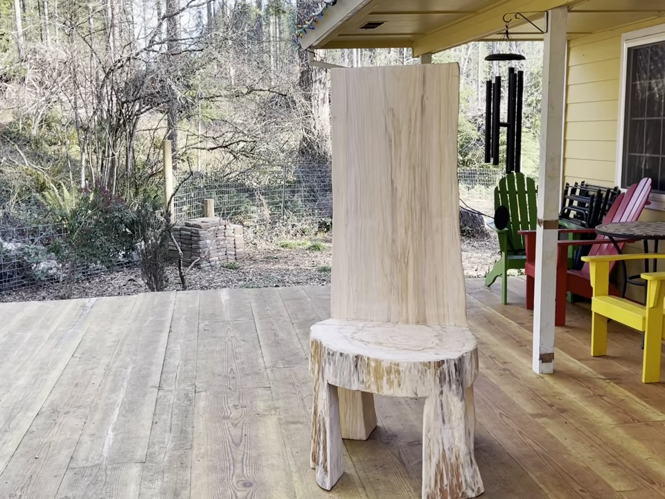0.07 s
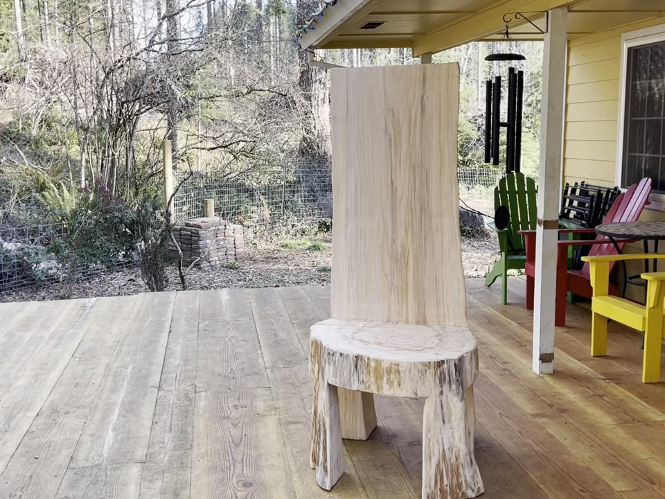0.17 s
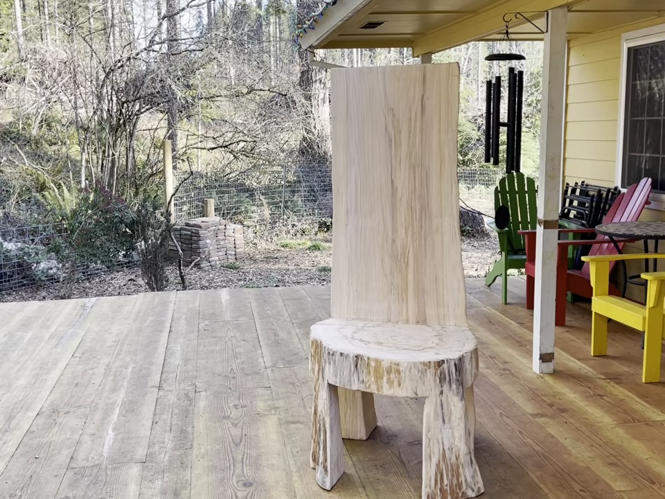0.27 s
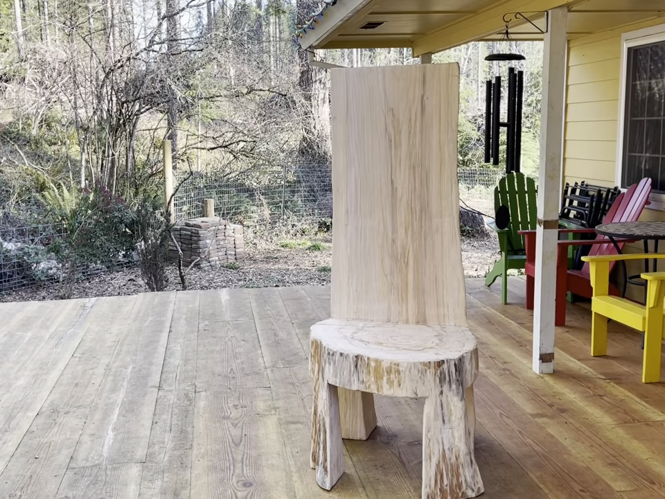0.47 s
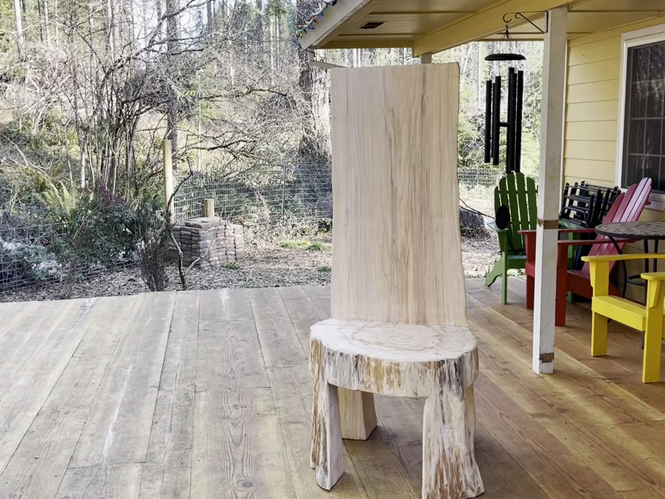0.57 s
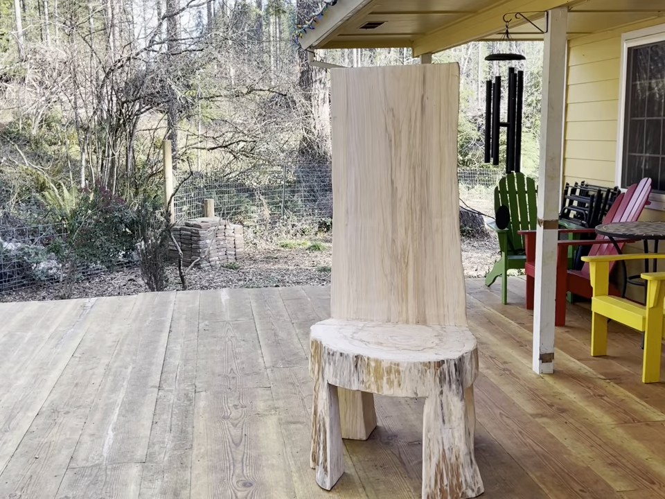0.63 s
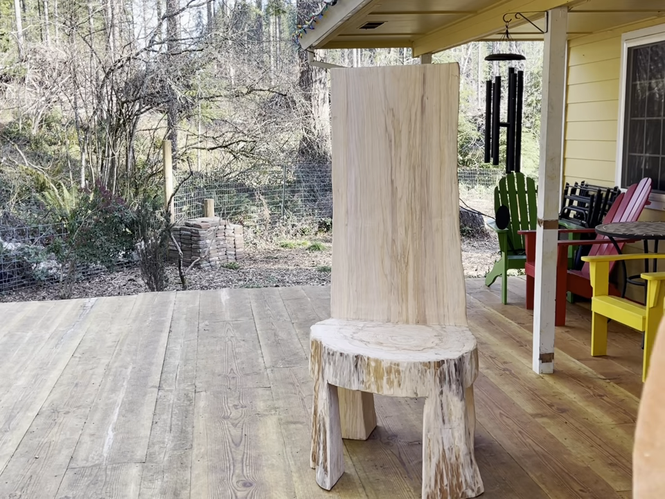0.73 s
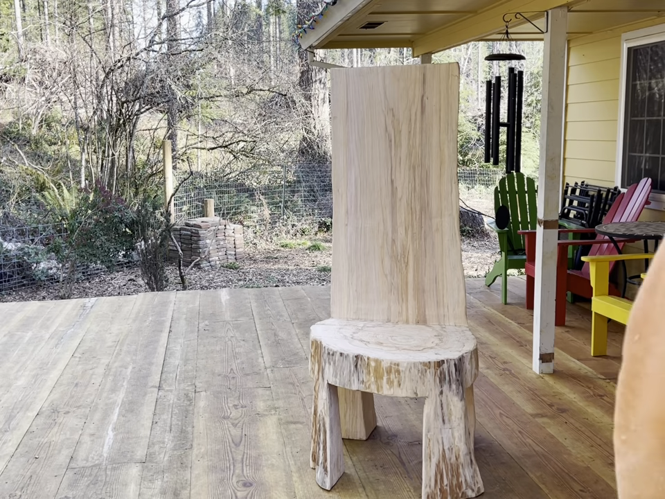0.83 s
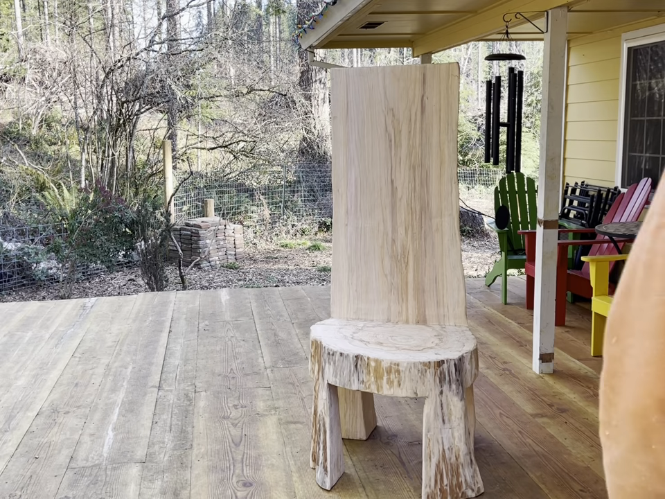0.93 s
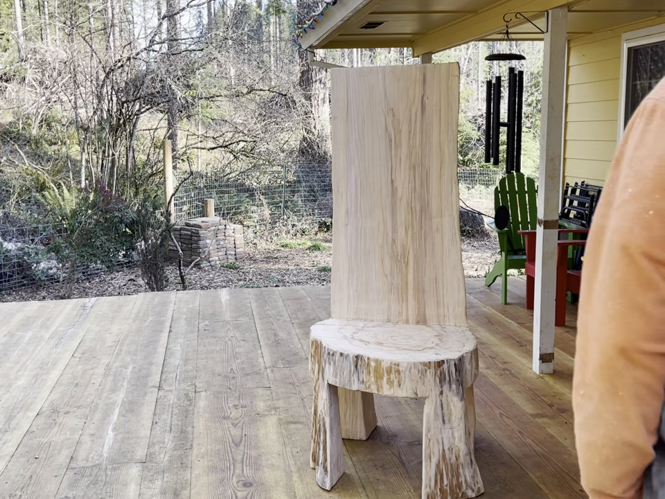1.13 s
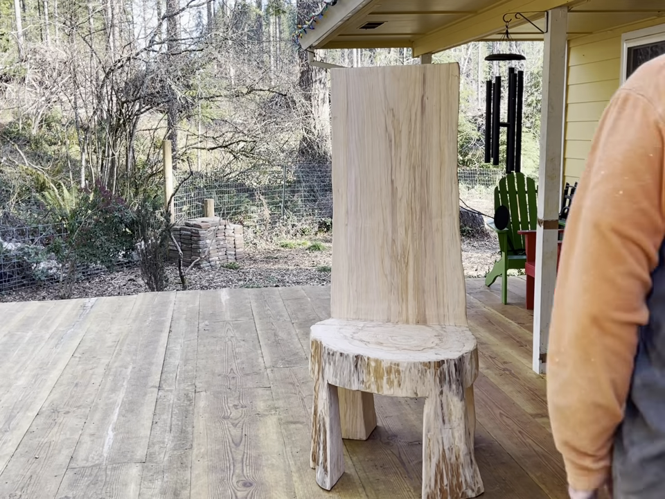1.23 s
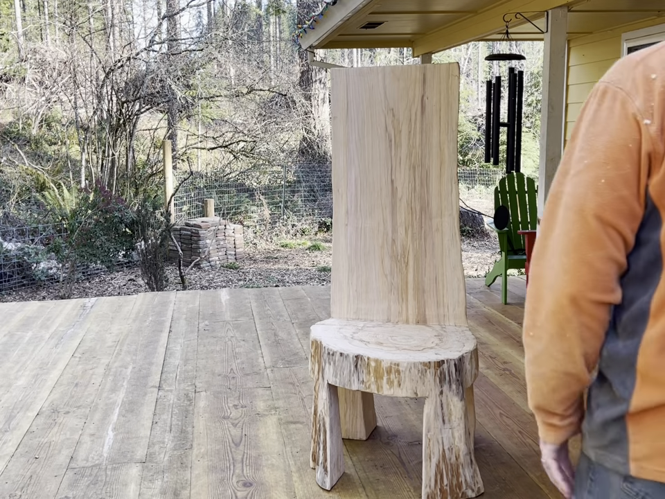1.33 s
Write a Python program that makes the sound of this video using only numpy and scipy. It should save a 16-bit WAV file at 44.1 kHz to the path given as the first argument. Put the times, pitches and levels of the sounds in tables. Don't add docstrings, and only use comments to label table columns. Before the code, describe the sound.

Two slow, heavy footsteps on a hollow wooden deck, the first loud and booming, the second softer with a clear toe slap; boards rattle, cloth rustles faintly, distant croaks and low rumble behind, close stereo microphone outdoors.

```python
import sys
import numpy as np
from scipy import signal
from scipy.fft import rfft, irfft
from scipy.io import wavfile
from scipy.ndimage import uniform_filter1d

SR = 44100
rng = np.random.default_rng(int(sys.argv[2]) if len(sys.argv) > 2 else 0)


def dump_mix(stems):
    frames = np.atleast_2d(stems).T
    limited = np.clip(frames, -1, 1)
    pcm = np.round(limited * 32767).astype(np.int16)
    wavfile.write(sys.argv[1], SR, pcm)


def makeup_ratio(level_db):
    decades = np.asarray(level_db, float) / 20
    return 10 ** decades


N = 61739

# (frequency [Hz], level [dB])
AIR_SPECTRUM = [(30, -28), (55, -3), (105, -6), (200, -20), (500, -34), (1300, -40), (3500, -59.5),
                (10000, -60.5)]
# (centre time [s], length [s], level [dB], pitch [Hz])
RUMBLE_SWELLS = [(0.024, 0.057, -51.5, 60.7), (0.124, 0.048, -50.5, 69), (0.468, 0.1, -50.5, 54),
                 (0.556, 0.043, -53, 68), (0.616, .06, -53, 97), (0.677, 0.13, -55.5, 59.7),
                 (0.766, 0.081, -49.5, 88.4), (0.846, 0.084, -51, 87.6), (0.984, 0.084, -44, 68.3),
                 (1.088, 0.066, -48.5, 95), (1.149, 0.056, -57, 85.5), (1.261, 0.073, -49, 91.3),
                 (1.328, 0.081, -51, 56), (1.375, 0.055, -50.5, 100)]
# (frequency [Hz], width [Hz], level [dB])
CHORUS_BANDS = [(760, 78, -3), (890, 44, -6.5), (682, 98, -2.5), (1750, 69, -15)]
# (time [s], level [dB])
CHORUS_LEVEL = [
    (0, -2.5),
    (0.421, -2.5),
    (.5, -1.5),
    (.92, -0.5),
    (1.15, 2.5),
    (1.4, -3),
]
# (start time [s], length [s], level [dB], pitch [Hz])
CROAKS = [(0.475, 0.039, -63, 760), (0.516, 0.025, -60.5, 761), (.545, .025, -67, 850),
          (.565, 0.024, -62, 888), (.588, 0.026, -66, 880), (0.607, 0.017, -57.5, 745),
          (0.636, 0.031, -60, 745), (0.675, 0.023, -64, 775), (0.703, 0.033, -66, 784),
          (0.726, 0.018, -67, 860), (.735, 0.022, -65, 680), (0.765, 0.012, -58, 786),
          (0.793, 0.022, -62, 760), (.79, 0.045, -67, 906), (.84, 0.047, -72, 715),
          (0.886, 0.022, -62.5, 792), (0.896, 0.02, -65, 850), (0.918, 0.025, -59, 760),
          (.575, 0.069, -76.5, 1790), (0.884, 0.036, -70.5, 1734), (1.248, 0.034, -74, 1750),
          (1.33, 0.055, -68, 703)]
# (time [s], level [dB], brightness [dB per octave])
STRIDE = [(.02, -85, -1.5), (.07, -81, -2.5), (0.162, -85.5, -3), (.2, -80.5, -0.5), (.26, -80, -2.5),
          (.37, -78, -2), (.45, -76, 1), (.6, -80.5, -1), (0.651, -88, -1.5), (0.904, -86, 0.5),
          (0.942, -72, -0.5), (1.05, -76, 1), (1.1, -77.5, -1.5), (1.18, -75.5, 0.5), (1.261, -84, -0.5),
          (1.4, -84.5, -2.5)]
# (frequency [Hz], level [dB])
CLOTH_SPECTRUM = [(500, 1), (1700, 0.5), (3000, -6), (6000, -12), (7400, -9.5), (9000, -5), (10500, -2.5),
                  (12300, -21)]
# (frequency [Hz], time to fall 60 dB [s])
DECK_DECAY = [(50, 0.88), (120, 0.74), (300, 0.63), (700, 0.26), (1500, 0.066), (5000, 0.075)]
# (frequency [Hz], level [dB], width [Hz])
BOARD_MODES = [(77, 4, 50), (135, -6.5, 5.9), (220, -0.5, 51), (280, 2.5, 20), (342, -0.5, 29),
               (464, 2.5, 42), (600, -3, 110), (715, 5, 45), (1080, -10, 83), (1195, 2, 130)]
# (time [s], peak level [dB], pitch [Hz], grainy tail [dB])
SOLE_TICKS = [(0.1945, -31.5, 1087, 15), (.1950, -49.5, 697, 27), (.1930, -52.5, 2340, 24),
              (.1930, -60, 4400, 14), (0.1944, -56.5, 9600, 24), (0.278, -44, 960, 5),
              (.2782, -58, 2670, 9), (0.57, -66, 8450, 8), (.9385, -41, 800, 9), (1, -70, 2200, 12),
              (.9378, -53, 9050, 21), (.9500, -53.5, 4840, 18), (1.0688, -44, 2830, 7),
              (1.0687, -42, 1500, 6), (1.0691, -34, 1020, 8.5), (1.077, -51, 1590, 14),
              (1.0980, -54, 915, 3), (1.1588, -49.5, 1710, 13.5)]
# (time [s], peak level [dB], pitch [Hz])
GRIT_CRACKS = [(.1955, -59, 5200), (.1958, -57, 3040), (.1990, -53, 1970), (.2010, -62, 3600),
               (.2105, -58, 3700), (.2080, -50, 1500), (.2150, -56, 1400), (.2240, -54, 1520),
               (.2330, -55, 1400), (.2220, -60, 2800), (.2780, -55.5, 3750), (.2770, -53, 1720),
               (.2850, -57, 1500), (.3460, -60, 1830), (1.0685, -56, 2160), (1.0760, -59, 2600),
               (1.0820, -57, 1700), (1.1240, -53, 1690), (1.1590, -53.5, 2700)]
# (time [s], peak level [dB], pitch [Hz], spread of the bending wave [ms], ringing of the deck [dB])
FOOT_BLOWS = [(0.197, -20, 355, 5.45, -5.5), (0.2139, -21, 202, 1.5, -12.5), (0.2318, -27, 280, 2, -15.5),
              (0.2534, -33, 139, 2.1, -7), (.2790, -37.5, 523, 0.82, 1), (0.347, -41, 78.5, 2.4, -5),
              (0.9448, -31, 260, 8.45, -6), (0.957, -32.5, 215, 2.7, -5), (0.969, -41.5, 218, 3.4, -13),
              (.9850, -35, 107, 5.5, -6), (1.0190, -44, 179, 2.8, -27), (1.0665, -40, 89, 1.1, -6),
              (1.0706, -36.5, 573, 2.8, -2.5), (1.111, -41, 320, 1.2, -16), (1.139, -41, 151, 1.8, -3)]
# (start time [s], level [dB], pitch [Hz], time to fall 60 dB [s])
BOARD_RINGS = [(.209, -27.5, 73.8, 0.22), (.2045, -37, 135, 0.11), (0.199, -46, 235, 0.24),
               (.1990, -39, 288, 0.13), (0.22, -42, 320, 0.35), (0.21, -49, 455, 0.06),
               (.9502, -42.5, 178, 0.32), (1.0688, -29.5, 618, 0.018), (1.072, -45.5, 248, 0.25),
               (1.075, -52, 460, 0.15), (1.08, -58.5, 690, 0.17)]
# (time [s], peak level [dB], pitch [Hz])
BOARD_KNOCKS = [(0.1998, -36.5, 198), (0.2096, -32, 264), (0.2221, -34.5, 295), (0.229, -34, 202),
                (0.2388, -57, 150), (0.2461, -31.5, 254), (0.263, -32, 103), (.2740, -35.5, 180),
                (0.288, -40, 192), (0.297, -36, 105), (.3360, -47.5, 198), (.3600, -41.5, 227),
                (.3720, -40.5, 110), (0.389, -43.5, 197), (0.9408, -33.5, 402), (0.9528, -39, 274),
                (.9640, -36, 254), (0.992, -39.5, 236), (1.0002, -41, 222), (1.0090, -49.5, 170),
                (1.0145, -47.5, 240), (1.0257, -46, 225), (1.078, -37.5, 420), (1.087, -43.5, 400),
                (1.0900, -45, 300), (1.0980, -45, 270), (1.125, -52, 205), (1.1060, -48, 500),
                (1.1160, -51.5, 455)]
# (frequency [Hz], coherence [0-1])
PORT_LIKENESS = [(60, 1), (350, 0.78), (800, 1), (2500, 0.38), (6500, .5), (8300, 0.93), (10300, 1),
                 (11500, 0.43)]
# (frequency [Hz], phase [rad])
PORT_PHASE = [(0, 0), (700, -1.05), (1400, -1.45), (3000, .8), (6800, .1), (7700, .9), (8700, -.2),
              (12000, -6.2)]
# (frequency [Hz], level difference [dB])
PORT_BALANCE = [(60, 1), (350, 1.5), (900, -3), (1500, 1), (2900, 5.5), (6900, 2), (8500, 1.7),
                (12000, -1.5)]


def evened(x):
    return x / np.sqrt(np.mean(x ** 2) + 1e-20)


def read(points, hz):
    f, value = np.transpose(points)
    return np.interp(np.log(hz + 1), np.log(f + 1), value)


def coloured(x, points):
    return irfft(rfft(x) * makeup_ratio(read(points, np.fft.rfftfreq(N, 1 / SR))), N)


def resonate(x, hz, width):
    turn = np.exp(2j * np.pi * hz * np.arange(x.shape[-1]) / SR)
    r = np.exp(-np.pi * width / SR)
    return 2 * (turn * signal.lfilter([1 - r], [1, -r], x / turn)).real


def air():
    level_db, patch_db, swell_db = -58, 1.5, 0.6
    frames = N // 512 + 5
    hz = np.fft.rfftfreq(2048, 1 / SR)
    a, b, c, d, patches = rng.standard_normal((frames, 1025, 5)).T
    patches = uniform_filter1d(patches, size=10, axis=0)
    patches = evened(uniform_filter1d(patches, size=6, axis=1))
    swell = evened(uniform_filter1d(rng.standard_normal(frames), size=12))
    spectrum_db = read(AIR_SPECTRUM, hz)[:, None] + patch_db * patches + swell_db * swell
    z = np.array([a + 1j * b, c + 1j * d]) * makeup_ratio(spectrum_db)
    return makeup_ratio(level_db) * evened(signal.istft(z, nperseg=2048, noverlap=1536)[1][:, :N])


def chorus():
    band_db, band_pan_db = -72.5, 1.5
    wander_hz, edge_s, croak_pan_db = 12, 0.004, 2
    port_lag = np.array([[0], [0.23]])
    time = np.arange(N) / SR
    bands = 0
    for f, width, db in CHORUS_BANDS:
        noise = rng.standard_normal((2, N))
        bands = bands + makeup_ratio(db) * resonate(resonate(noise, f, width), f, width)
    level = makeup_ratio(band_db + np.interp(time, *np.transpose(CHORUS_LEVEL)))
    out = level * evened(bands) * makeup_ratio([[band_pan_db], [-band_pan_db]])
    for s, length, db, hz in CROAKS:
        t = time - s
        wander = evened(uniform_filter1d(rng.standard_normal(N), size=300))
        phase = hz * t + np.cumsum(wander) * wander_hz / SR + port_lag
        shape = np.clip(np.minimum(t, length - t) / edge_s, 0, 1)
        out = out + makeup_ratio(db) * shape * np.sin(2 * np.pi * phase) * makeup_ratio([[croak_pan_db], [-croak_pan_db]])
    return out


def rumble_swells():
    t = np.arange(N) / SR
    out = np.zeros(N)
    for s, length, db, hz in RUMBLE_SWELLS:
        envelope = np.cos(np.pi * ((t - s) / length).clip(-0.5, 0.5)) ** 2
        out += makeup_ratio(db) * envelope * np.cos(2 * np.pi * hz * (t - s))
    return out


def cloth():
    level_db, grains_per_s, grain_db, grain_share = 11, 2500, 3.5, 0.46
    size = makeup_ratio(grain_db * np.minimum(rng.exponential(1, (2, N)), 3))
    size = size * (rng.random((2, N)) < grains_per_s / SR)
    crackle = evened(size * rng.standard_normal((2, N)))
    rub = grain_share * crackle + (1 - grain_share) * rng.standard_normal((2, N))
    hz, t, z = signal.stft(evened(coloured(rub, CLOTH_SPECTRUM)), SR, nperseg=256)
    s, stride_db, bright_db = np.transpose(STRIDE)
    octaves = np.log2((hz[:, None] + 200) / 4500)
    z = z * makeup_ratio(np.interp(t, s, stride_db) + level_db + octaves * np.interp(t, s, bright_db))
    return signal.istft(z, SR, nperseg=256)[1][:, :N]


def pulse(s, db, pitch_hz, spread_ms, below, above):
    hz = np.fft.rfftfreq(2 * N, 1 / SR)
    u = hz / pitch_hz
    push = u ** below / (1 + u ** (below + above))
    bending = np.exp(2j * np.pi * spread_ms / 1000 * pitch_hz * (np.sqrt(u) - 1) ** 2)
    delay = np.exp(-2j * np.pi * hz * s)
    return makeup_ratio(db) * push * bending * N / push.sum() * delay


def deck(gap_db):
    echo_share, build_up_s = 0.12, 0.00047
    hz, t, z = signal.stft(rng.standard_normal((2, SR // 2)), SR, nperseg=512, noverlap=448)
    decay = makeup_ratio(-60 * t / read(DECK_DECAY, hz)[:, None])
    tail = signal.istft(z * decay, SR, nperseg=512, noverlap=448)[1]
    tail = tail * np.minimum(np.arange(tail.shape[1]) / SR / build_up_s, 1) / np.linalg.norm(tail[0])
    modes = sum(makeup_ratio(db) * resonate(tail, f, width) for f, db, width in BOARD_MODES)
    return rfft(echo_share * (makeup_ratio(gap_db) * tail + modes), 2 * N)


def tick(s, db, hz):
    return pulse(s, db, hz, spread_ms=0.4, below=2.2, above=8)


def sole_ticks():
    out = 0
    for s, db, hz, tail_db in SOLE_TICKS:
        out = out + tick(s, db, hz) * (1 + makeup_ratio(tail_db - 7) * deck(gap_db=9))
    return irfft(out)[:, :N]


def grit():
    return irfft(sum(tick(s, db, hz) for s, db, hz in GRIT_CRACKS))[:N]


def footfalls():
    out = 0
    for s, db, hz, spread_ms, ring_db in FOOT_BLOWS:
        blow = pulse(s, db, hz, spread_ms, below=1.02, above=3.9)
        out = out + blow * (1 + makeup_ratio(ring_db + 8.5) * deck(gap_db=-4))
    return irfft(out)[:, :N]


def board_rings():
    rise_turns = 0.2
    out = np.zeros(N)
    for s, db, hz, t60 in BOARD_RINGS:
        t = np.maximum(np.arange(N) / SR - s, 0)
        rise = 1 - np.exp(-t * hz / rise_turns)
        out += makeup_ratio(db - 60 * t / t60) * rise * np.sin(2 * np.pi * hz * t)
    return out


def board_knocks():
    knocks = sum(pulse(s, db, hz, spread_ms=2.7, below=1.5, above=4.7) for s, db, hz in BOARD_KNOCKS)
    return irfft(knocks)[:N]


def bird():
    start_s, length_s, level_db, fade_db = 0.734, 0.095, -73.5, -12
    pitch_hz, sag_hz, swing_hz, trill_hz, rough_hz = 8400, -150, 410, 95, 209
    u = (np.arange(N) / SR - start_s) / length_s
    hz = pitch_hz + sag_hz * u + swing_hz * np.sin(2 * np.pi * trill_hz * length_s * u)
    hz = hz + rough_hz * evened(uniform_filter1d(rng.standard_normal(N), size=60))
    envelope = np.clip(np.minimum(u, 1 - u) / 0.032, 0, 1) * makeup_ratio(level_db + fade_db * u.clip(0, 1))
    call = np.sin(2 * np.pi * np.cumsum(hz) / SR) * envelope
    trees = rng.standard_normal((2, 4000)) * makeup_ratio(-60 * np.arange(4000) / SR / 0.38)
    trees = trees / np.linalg.norm(trees[0])
    return call + makeup_ratio(1) * signal.fftconvolve(call[None], trees, axes=1)[:, :N]


def ports(field):
    hz = np.fft.rfftfreq(2 * N, 1 / SR)
    a, b = rfft(np.hstack([field, field[:, ::-1]]))
    same = np.clip(read(PORT_LIKENESS, hz), 0, 1)
    tilt = makeup_ratio(read(PORT_BALANCE, hz) / 2)
    lag = np.exp(-1j * np.interp(hz, *np.transpose(PORT_PHASE)))
    right = (same * a + np.sqrt(1 - same ** 2) * b) * lag
    return irfft(np.array([a * tilt, right / tilt]))[:, :N]


def scene():
    background = air() + rumble_swells()
    walker = cloth() + sole_ticks() + grit() + footfalls() + board_rings() + board_knocks()
    return ports(background + walker + bird()) + chorus()


def top_cut(x):
    return signal.sosfilt(signal.butter(12, 12930, fs=SR, output="sos"), x)


def record(dry):
    low_pass = signal.firwin(511, 13000, window=("kaiser", 9), fs=SR)
    limited = signal.oaconvolve(dry, low_pass[None], "same")
    return top_cut(limited)


dry = scene()
out = record(dry)
dump_mix(out)
```